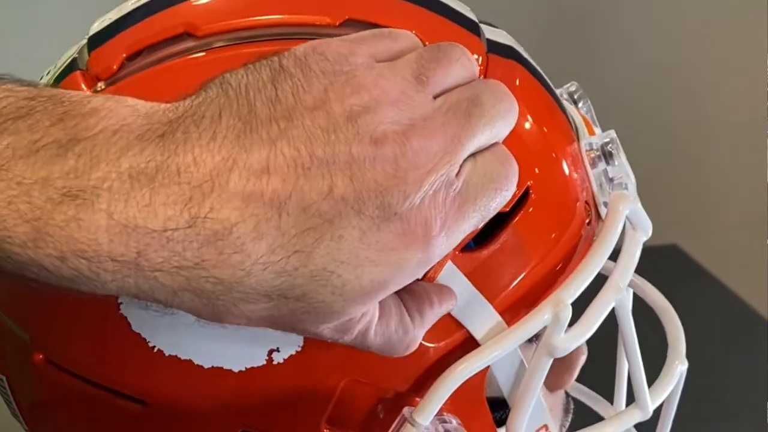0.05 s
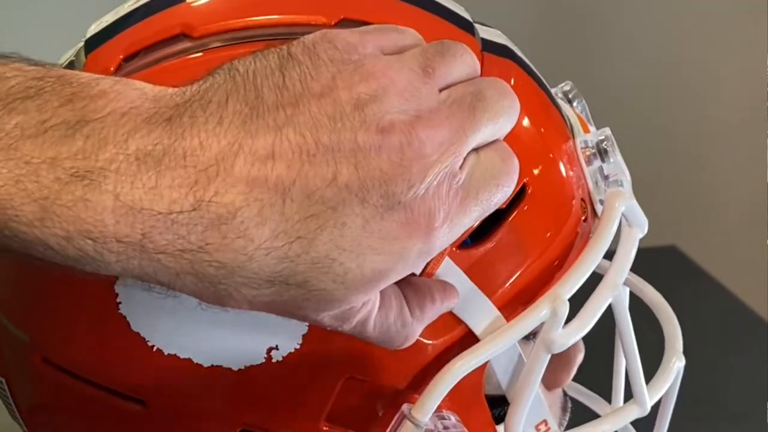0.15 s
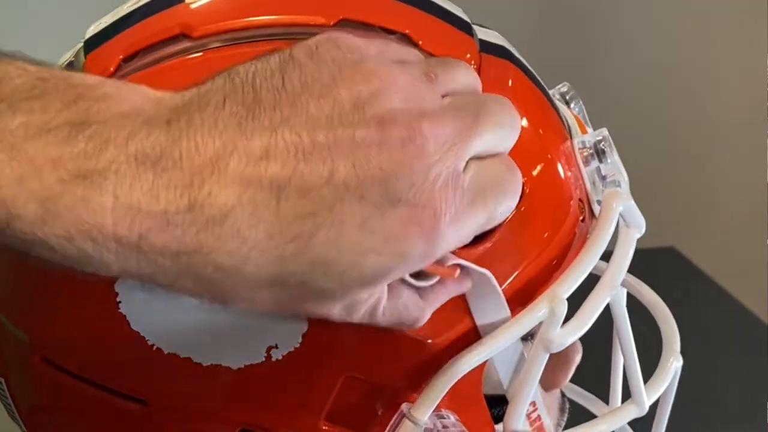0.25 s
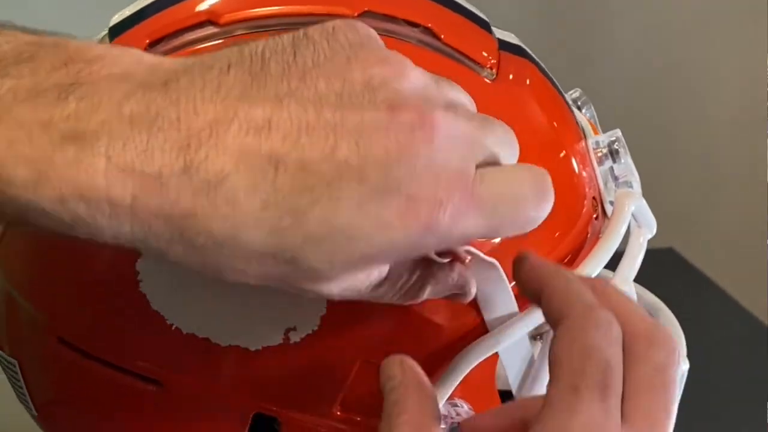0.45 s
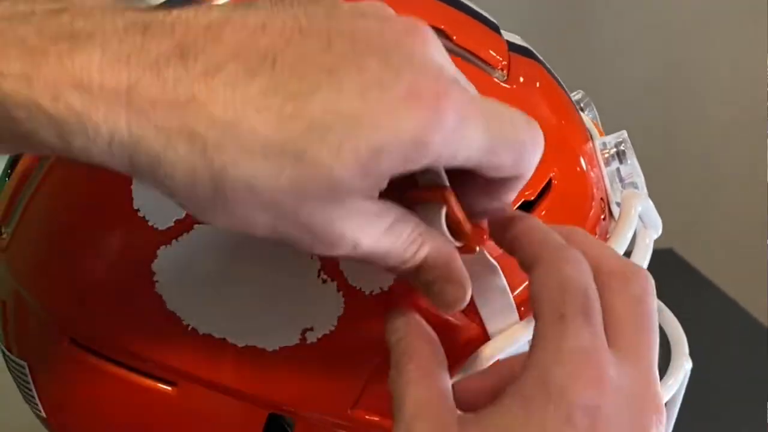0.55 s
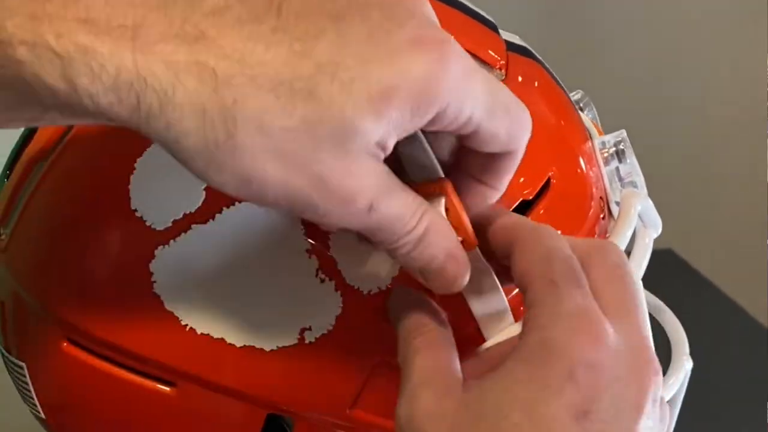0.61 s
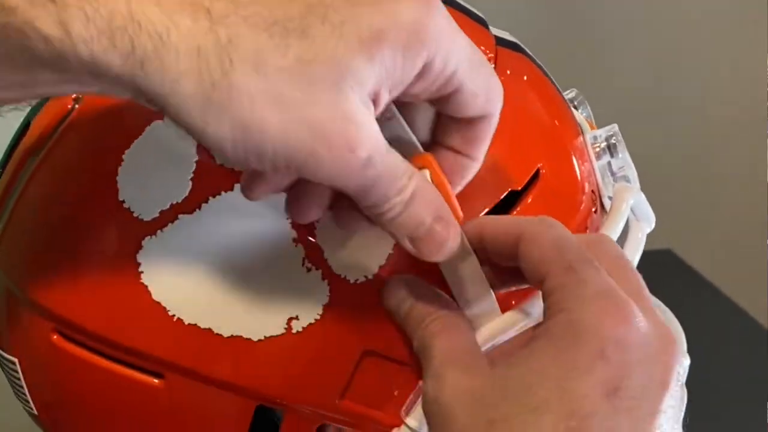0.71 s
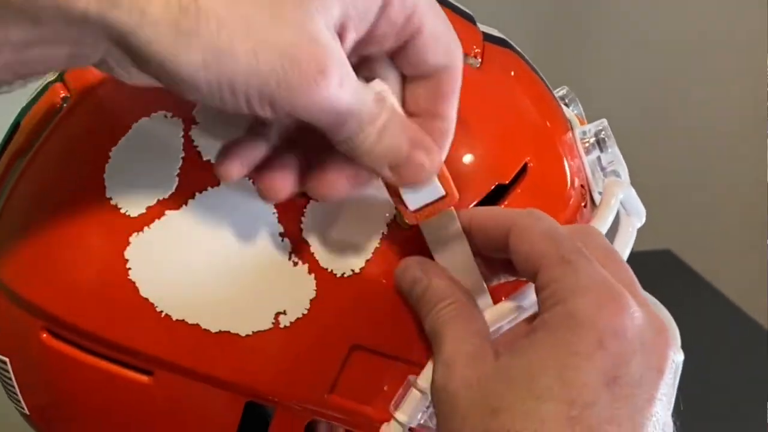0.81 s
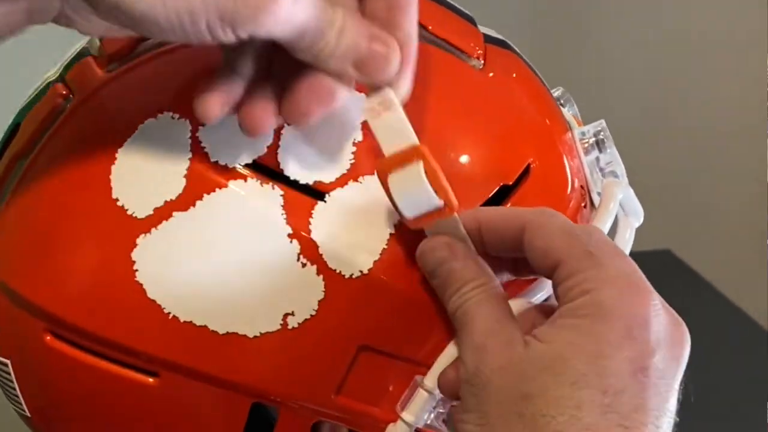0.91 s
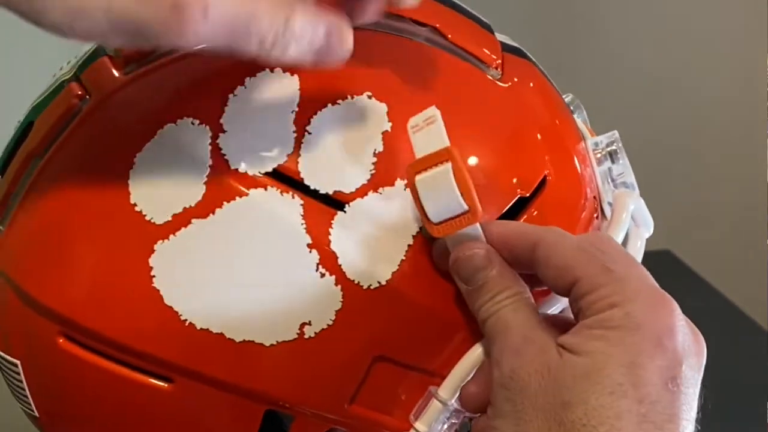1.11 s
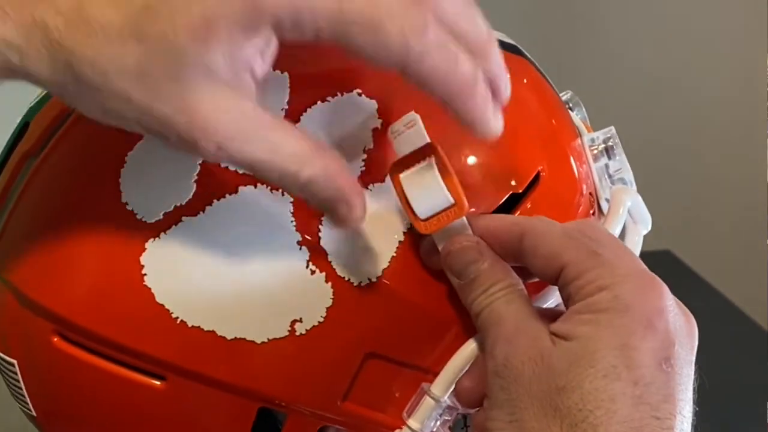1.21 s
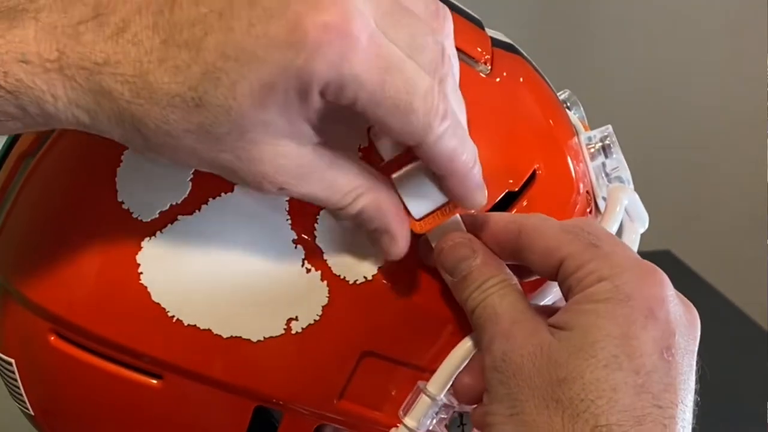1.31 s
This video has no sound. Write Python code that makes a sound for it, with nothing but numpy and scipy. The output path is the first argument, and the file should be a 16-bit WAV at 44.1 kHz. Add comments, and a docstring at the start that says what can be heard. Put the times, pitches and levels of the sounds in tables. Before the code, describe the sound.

A chin strap snap pops sharply off a hard plastic helmet, then the stiff strap ticks and rustles

```python
"""A chin strap is levered off its stud on a hard plastic helmet shell, in a quiet room, on a stereo microphone.
The stud creaks in stick-slip jerks, then snaps off: decaying sine modes ring the shell under a noise crack.
Fingers and buckle tap the same modes, nearer than the stud; skin rubs the shell as fluttering dull noise.
The stiff strap ticks in bright noise bursts and rustles in fine grains.
Shaped noise makes the low room rumble with its faint hiss, and noise dying band by band makes the echo."""
import sys
import numpy as np
from scipy import signal
from scipy.fft import rfft, irfft
from scipy.io import wavfile
from scipy.ndimage import uniform_filter1d

SR = 44100
rng = np.random.default_rng(int(sys.argv[2]) if len(sys.argv) > 2 else 0)


def invert_db(level):
    """Linear amplitude ratio for a level in decibels (20 dB per decade), elementwise."""
    return 10 ** (np.asarray(level, dtype=float) / 20)


def unload_audio(sound):
    """Save the sound as a 16-bit wav file, at the path given as the first command line argument."""
    columns = np.transpose(np.atleast_2d(sound))
    # keep every value between -1 and 1, then stretch to whole-number steps
    steps = np.round(np.clip(columns, -1, 1) * 32767)
    wavfile.write(sys.argv[1], SR, steps.astype(np.int16))


N = 59535   # length [samples]


def rms_one(x):
    """Scale x to an rms of one."""
    return x / np.sqrt(np.mean(x ** 2) + 1e-20)


def at_hz(points, hz, column=1):
    """Read a table column at hz, interpolating along log frequency."""
    points = np.array(points)
    return np.interp(np.log(hz), np.log(points[:, 0]), points[:, column])


def level(rows):
    """Gain along a (time [s], level [dB]) curve, at -120 dB outside it."""
    s, db = np.transpose(rows)
    return invert_db(np.interp(np.arange(N) / SR, s, db, left=-120, right=-120))


def colour(x, spectrum):
    """Filter x by a (frequency [Hz], gain [dB]) table, without delay."""
    hz = np.maximum(np.fft.rfftfreq(x.shape[-1], 1 / SR), 1)
    return irfft(rfft(x) * invert_db(at_hz(spectrum, hz)), x.shape[-1])


def stereo_noise(alike_points, column):
    """White noise on two channels, whose likeness depends on frequency."""
    hz = np.maximum(np.fft.rfftfreq(N, 1 / SR), 1)
    alike = np.clip(at_hz(alike_points, hz, column=column), -1, 1)
    mid, side = rfft(rng.standard_normal((2, N)))
    both = np.sqrt(1 + alike) * mid + np.sqrt(1 - alike) * side * [[1], [-1]]
    return irfft(both / np.sqrt(2), N)


def slow_noise(size):
    """Random wander of rms one: noise averaged twice over size samples."""
    once = uniform_filter1d(rng.standard_normal(N), size=size)
    return rms_one(uniform_filter1d(once, size=size))


# tone of the quiet room: (frequency [Hz], relative density [dB per Hz])
RUMBLE_COLOUR = [(15, -27.5), (28, -14.5), (52, 1), (80, 1.5), (110, -9.5), (160, -15.5), (290, -28),
                 (800, -45.5), (1600, -52), (2000, -44.5), (3000, -56), (5500, -55.5), (9500, -56),
                 (12500, -69.5), (15200, -67), (17000, -83)]
# how alike the two channels are, for rumble and rub: (frequency [Hz], likeness [-1 to 1])
BACKGROUND_ALIKE = [(60, 1), (200, 0.94), (600, 0.95), (3000, 0.38), (15000, .1)]


def rumble():
    """Low room rumble with a faint hiss above: shaped noise, slowly uneven in level."""
    level_db, patchy_db = -49.5, 1.5   # patchy: rms swing of the level
    gain = invert_db(level_db + patchy_db * slow_noise(2000))
    return gain * rms_one(colour(stereo_noise(BACKGROUND_ALIKE, column=1), RUMBLE_COLOUR))


# skin brushing the shell, before flutter: (time [s], level [dB])
RUB_LEVEL = [(0, -57.5), (.03, -61.5), (.16, -56), (.2, -54.5), (.3, -56), (.45, -74), (.54, -65.5),
             (.61, -57.5), (.64, -89), (.70, -69), (.725, -61.5), (.76, -71), (.80, -73), (.9, -84),
             (.96, -89), (1.09, -69.5), (1.112, -63.5), (1.178, -64), (1.2, -70.5), (1.24, -81),
             (1.35, -67.5)]
# tone of the rub: (frequency [Hz], relative density [dB per Hz])
RUB_COLOUR = [(100, -29.5), (200, -3.5), (420, -2), (620, -11.5), (900, -17.5), (1200, -16.5), (2200, -20),
              (3000, -29.5), (5500, -33.5), (7000, -54.5)]


def rub():
    """Skin drags over the shell: dull noise that flutters in level."""
    flutter_db = 2.5   # rms swing
    flutter = invert_db(flutter_db * slow_noise(150))
    return level(RUB_LEVEL) * rms_one(colour(stereo_noise(BACKGROUND_ALIKE, column=1), RUB_COLOUR) * flutter)


# modes of shell and stud: (frequency [Hz], level when snapped [dB], full decay time t60 [s],
# left minus right [dB], left lead [rad], level when slipped [dB])
SHELL_MODES = [(381, -20, 0.018, -1.5, 1.5, -13), (389.7, -10, 0.04, 0, -1, -11),
               (479, -20, 0.024, 1.5, -0.5, -6), (609, -13.5, 0.029, 6.5, 0.48, 0),
               (757.4, -15, 0.027, 1, 1.4, -6), (932, -8.5, 0.025, 4.5, 0.5, -8),
               (1157, -10, .03, -4, 0.65, -3.5), (1376, -8.5, 0.028, -3, -1, -11),
               (1650.5, 2, 0.015, -5.5, -0.45, -2), (2073, -10, 0.024, -2, 1.87, -9),
               (2437, -12, 0.022, 4, 1.73, -15), (2963, -15.5, 0.015, 2, 2, -14),
               (3787, -11.5, 0.006, 1, -1, -26.5), (4160, -6, 0.01, -0.5, 1, -33.5),
               (4983, -0.5, 0.007, -2.5, 0.46, -21.5), (6780, -9, 0.0035, -3.5, 1.8, -32.5),
               (9040, -4, 0.0053, -2.5, -1.5, -33), (10990, -14, 0.012, 1, 1.5, -36),
               (14200, -15, .004, -8, -1, -30.5)]
# the stud lets go: (time [s], level [dB])
SNAP = [(0.2167, -4)]
# stick-slip jerks of the stud: (time [s], level [dB])
SLIPS = [(.003, -45), (.0095, -44), (.016, -46), (0.0223, -37.5), (.030, -36), (.037, -43), (.045, -46.5),
         (.054, -43.5), (0.065, -45), (.081, -37), (0.094, -36.5), (.108, -38.5), (.122, -41.5),
         (.137, -36), (.146, -38), (.152, -43.5), (0.157, -41.5)]
# fingers and buckle tap the shell: (time [s], level [dB], most excited frequency [Hz], spread [octaves])
TAPS = [(.402, -54, 970, 0.92), (0.412, -56, 1242, 0.97), (.446, -62, 1780, 1.34), (.522, -56, 1300, 0.76),
        (.560, -53.5, 1190, 1.0), (0.564, -51, 1100, 0.8), (.586, -49, 520, 2.5), (.598, -62, 985, 0.96),
        (0.69, -67.5, 1410, 0.61), (0.715, -52, 595, 0.66), (.722, -52, 447, 0.62), (.733, -53, 400, 0.39),
        (.750, -72, 400, 0.67)]
# a fingertip judders almost evenly over the shell: time [s]
JUDDER_S = [1.105, 1.113, 1.121, 1.127, 1.136, 1.142, 1.151, 1.159, 1.168, 1.174]


def shell():
    """Every blow rings the same modes: bending waves bring the highs first, each swells briefly and dies."""
    travel_s, travel_power = 0.0021, 0.85   # delay of stud blows at 1 kHz; lows arrive later
    swell_cycles = 0.97   # time constant of the build-up
    tap_path_share, tap_ring_share = 0.39, 0.85   # taps land nearer; the finger damps the ring
    stud_s, stud_db = np.transpose(SNAP + SLIPS)
    is_slip = np.arange(len(stud_s)) >= len(SNAP)
    judder = [(s, -62, 1100, 1.55) for s in JUDDER_S]   # columns as in TAPS
    tap_s, tap_db, tap_hz, octaves = np.transpose(TAPS + judder)
    side = np.array([[0.5], [-0.5]])   # splits each difference between left and right
    out, t = np.zeros((2, N)), np.arange(SR // 8) / SR
    for hz, snap_db, t60, pan_db, lead, slip_db in SHELL_MODES:
        stud = np.zeros(N)
        uneven_slip_db = slip_db + rng.normal(0, 2.3, len(stud_s))
        stud[(stud_s * SR).astype(int)] = invert_db(stud_db + np.where(is_slip, uneven_slip_db, snap_db))
        # a tap excites most the modes near its own frequency
        reach = np.exp(-(np.log2(hz / tap_hz) / octaves) ** 2)
        taps = np.zeros(N)
        taps[(tap_s * SR).astype(int)] = invert_db(tap_db) * reach * invert_db(rng.normal(0, 2.6, len(tap_s)))
        for hits, path, rings in (stud, 1, 1), (taps, tap_path_share, tap_ring_share):
            age = np.maximum(t - path * travel_s * (1000 / hz) ** travel_power, 0)
            swell = 1 - np.exp(-age * hz / swell_cycles)
            decay = invert_db(-60 * age / (rings * t60))
            ring = swell * decay * np.sin(2 * np.pi * hz * age + lead * side) * invert_db(pan_db * side)
            out += signal.fftconvolve(hits[None], ring, axes=1)[:, :N]
    return out


# tone of the crack: (frequency [Hz], relative level [dB])
CRACK_COLOUR = [(500, -30), (1500, -10), (2800, -6.5), (5000, -1), (6500, -5.5), (9000, -6.5),
                (12000, -11.5), (15500, -11.5), (17000, -43)]


def crack():
    """Bright decaying noise burst of the snap and, far weaker, later and duller, of every slip."""
    t60_s, right_lag_s = 0.026, 0.00003   # the right microphone port hears it later
    slip_top_hz = 6060
    clicks = np.zeros((2, N))
    # share of the blow's level [dB] and lag behind it [s]
    for row, blows, share_db, lag_s in (0, SNAP, -12, 0.00074), (1, SLIPS, -24.5, 0.0015):
        s, db = np.transpose(blows)
        clicks[row, ((s + lag_s) * SR).astype(int)] = invert_db(db + share_db)
    envelope = signal.lfilter([1], [1, -invert_db(-60 / (t60_s * SR))], clicks)
    snap, slips = rms_one(colour(rng.standard_normal(N), CRACK_COLOUR)) * envelope
    left = snap + signal.sosfilt(signal.butter(2, slip_top_hz, fs=SR, output="sos"), slips)
    delay = np.exp(-2j * np.pi * np.fft.rfftfreq(N, 1 / SR) * right_lag_s)
    return np.array([left, irfft(rfft(left) * delay, N)])


# ticks of the stiff strap: (time [s], level before a common 1 dB lift [dB], gain of the 3.8-6 kHz band [dB])
TICKS = [(0.1381, -54, 19), (.147, -56, 17.5), (0.4148, -46.5, 4), (0.4328, -58, 8.5), (0.467, -40, 6.5),
         (0.5841, -52, 10.5), (0.6862, -61.5, 0), (0.7157, -56.5, 5), (0.73, -66, 9), (0.819, -38.5, -3),
         (0.849, -45.5, -6), (0.859, -39.5, -7), (0.875, -41, -10), (0.889, -36.5, -1.5),
         (0.9021, -43, -16), (0.908, -39, -12), (0.914, -39, -10), (0.9521, -37.5, 6.5), (0.963, -47, 3),
         (1.0009, -41, -2.5), (1.0244, -52, 5), (1.03, -39.5, 5.5), (1.0797, -42.5, -2.5),
         (1.112, -41, 5.5), (1.261, -45.5, 6.5), (1.272, -52, 9), (1.3001, -52.5, 8), (1.3267, -45.5, 16.5),
         (1.3434, -49.5, 11)]
# tone of the strap: (frequency [Hz], relative density [dB per Hz])
STRAP_COLOUR = [(1500, -20), (2660, -12.5), (3450, -22), (4250, -8), (5260, -10), (7030, -10.5), (8600, -1),
                (11000, -3.5), (13400, -6.5), (15200, -0.5), (16000, -11.5), (16500, -24.5)]
# strap sliding: (time [s], level [dB])
RUSTLE = [(.36, -97), (.41, -59.5), (.48, -69), (.53, -71.5), (.6, -86), (.63, -115), (.68, -105),
          (.72, -78.5), (.79, -62), (.86, -59.5), (.92, -50), (.945, -86), (.98, -92), (1.05, -75),
          (1.12, -80), (1.19, -94), (1.25, -114), (1.27, -59), (1.31, -88.5), (1.35, -63)]


def strap():
    """Short bright noise bursts for the ticks, over fine random grains while the strap slides."""
    tick_t60_s, tick_rise_s = 0.011, 0.0006
    grains_per_s, grain_spread_db = 1500, 3.5
    t = np.arange(SR // 20) / SR
    shape = (1 - np.exp(-t / tick_rise_s)) * invert_db(-60 * t / tick_t60_s)
    bright = rms_one(colour(stereo_noise([(1000, 0.17), (16000, 0.067)], column=1), STRAP_COLOUR))
    lower = signal.sosfilt(signal.butter(2, [3800, 6000], "band", fs=SR, output="sos"), bright)
    ticks = np.zeros((2, N))
    for s, db, lower_db in TICKS:
        i = int(s * SR)
        n = min(len(t), N - i)
        burst = bright + (invert_db(lower_db) - 1) * lower
        ticks[:, i:i + n] += invert_db(db + 1.0) * shape[:n] * burst[:, i:i + n]
    sizes = invert_db(grain_spread_db * np.minimum(rng.exponential(1, (2, N)), 4))
    sizes = sizes * rng.choice([-1, 1], (2, N))
    # grains fall at the same moments on both channels, over a little steady noise
    grains = sizes * (rng.random(N) < grains_per_s / SR) + 0.11 * rng.standard_normal((2, N))
    return ticks + level(RUSTLE) * rms_one(colour(grains, STRAP_COLOUR))


# room echo in octave bands: (centre frequency [Hz], relative level [dB], t60 [s], left-right likeness [-1 to 1])
ROOM_BANDS = [(200, -0.5, 0.98, 0.92), (400, 6.5, 0.4, 0.94), (855, 7.5, 0.38, 0.28),
              (1703, 4.5, 0.33, 0.68), (3160, 10.5, 0.42, 0.12), (5070, 4, .5, .3), (6000, 3, 0.29, 0),
              (13200, 5.5, 0.49, 0.45)]


def room(x):
    """Dense echo: convolution with noise that fades in after the blow and dies band by band."""
    fade_in_s = 0.004
    t = np.arange(SR // 2) / SR
    noise = stereo_noise(ROOM_BANDS, column=3)[:, :len(t)]
    echo = np.zeros((2, len(t)))
    for hz, db, t60, _ in ROOM_BANDS:
        edges = [hz / np.sqrt(2), min(hz * np.sqrt(2), 19000)]
        band = signal.sosfilt(signal.butter(2, edges, "band", fs=SR, output="sos"), noise)
        echo += invert_db(db - 60 * t / t60) * band
    echo = echo * (1 - np.exp(-(t / fade_in_s) ** 2)) / np.sqrt(SR / 50)
    return signal.fftconvolve(x[None], echo, axes=1)[:, :N]


# what the snap sends into the room: (frequency [Hz], relative level [dB])
SNAP_SENT = [(100, -31), (200, -13.5), (400, -2.5), (740, -11.5), (920, -14.5), (1690, 4), (2200, -7.5),
             (2980, -23), (4200, -12.5), (4970, -7.5), (6500, -24), (8450, -10.5), (11600, -20.5),
             (15600, -26), (17000, -29.5)]
# the shell's ring reaches the room duller: (frequency [Hz], gain before the send level [dB])
SHELL_SENT = [(100, -1.5), (390, -12), (1000, -2.5), (1600, -11), (3500, -17), (17000, -28.5)]


def scene():
    """All sources at the microphone, with the room echo of shell, snap and strap."""
    shell_db, snap_db, strap_db = -16, 6.5, -20.5   # levels sent to the room
    ringing, strap_sound = shell(), strap()
    pulse = np.zeros(N)
    pulse[int(SNAP[0][0] * SR)] = invert_db(snap_db)
    sent = invert_db(shell_db) * colour(ringing[1], SHELL_SENT)
    sent = sent + colour(pulse, SNAP_SENT) + invert_db(strap_db) * strap_sound[0]
    return ringing + crack() + strap_sound + rub() + rumble() + room(sent)


def band_limit(x):
    """A steep low-pass at the top of the band."""
    return signal.sosfilt(signal.butter(12, 17020, fs=SR, output="sos"), x)


# fixed treble dips: (frequency [Hz], width [Hz], depth [dB])
TREBLE_DIPS = [(7400, 450, -16), (13500, 800, -16), (16600, 500, -18)]


def record(dry):
    """Fixed bell-shaped dips hollow the treble."""
    hz = np.fft.rfftfreq(N, 1 / SR)
    dips_db = sum(db * np.exp(-((hz - dip_hz) / width_hz) ** 2) for dip_hz, width_hz, db in TREBLE_DIPS)
    mix = irfft(rfft(dry) * invert_db(dips_db), N)
    return band_limit(mix)


dry = scene()
out = record(dry)
unload_audio(out)
```